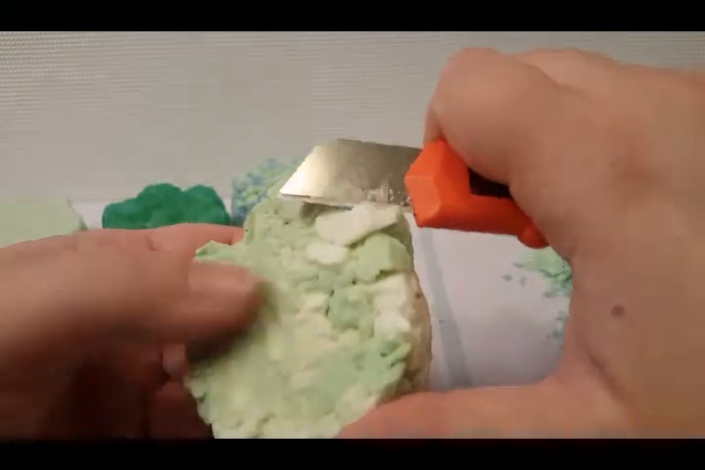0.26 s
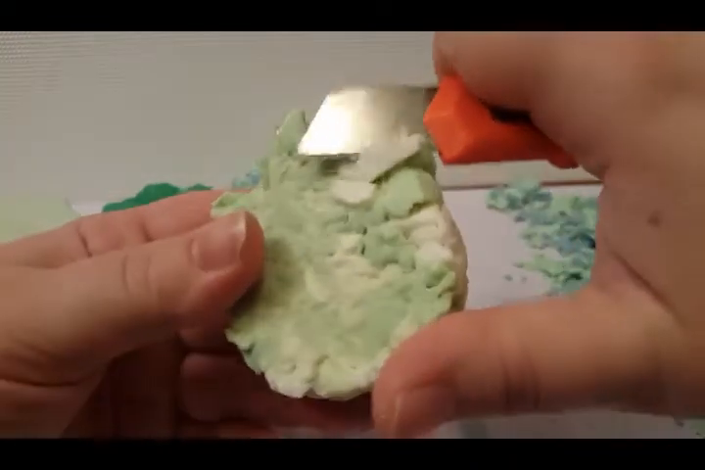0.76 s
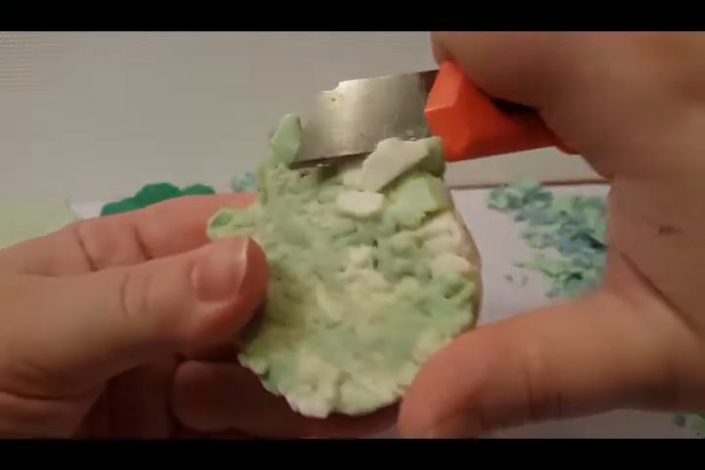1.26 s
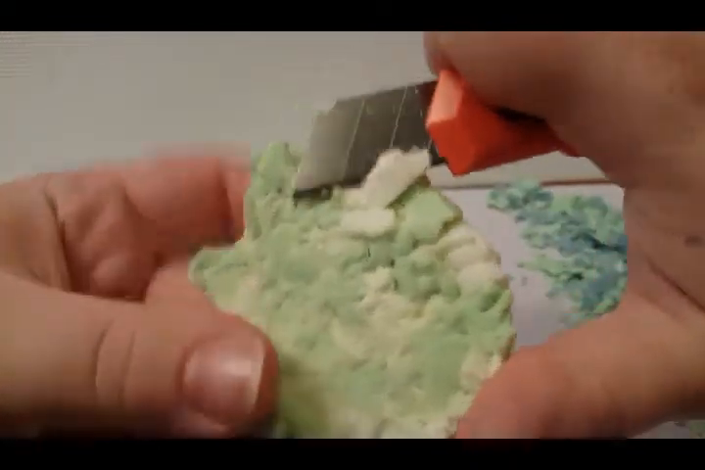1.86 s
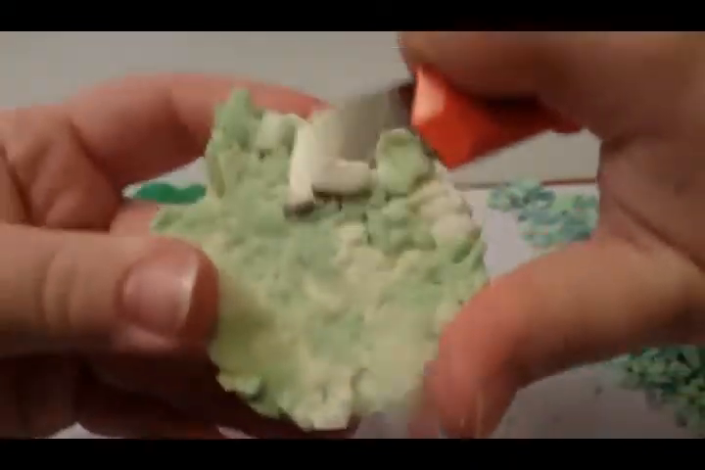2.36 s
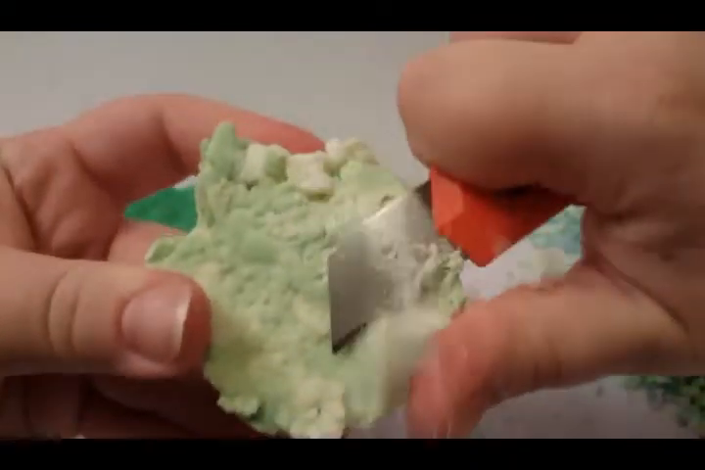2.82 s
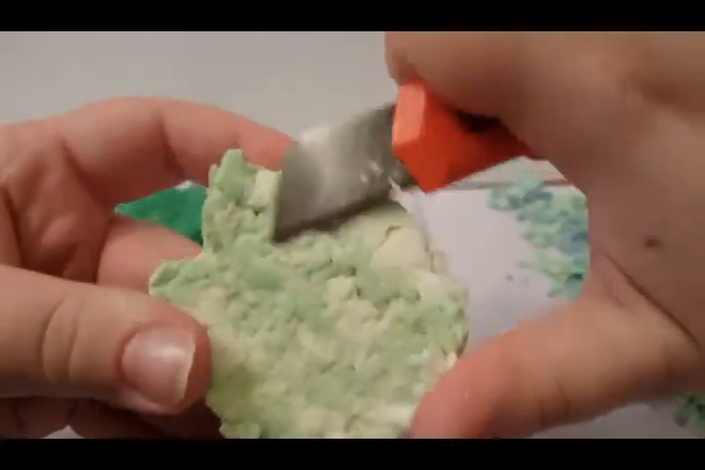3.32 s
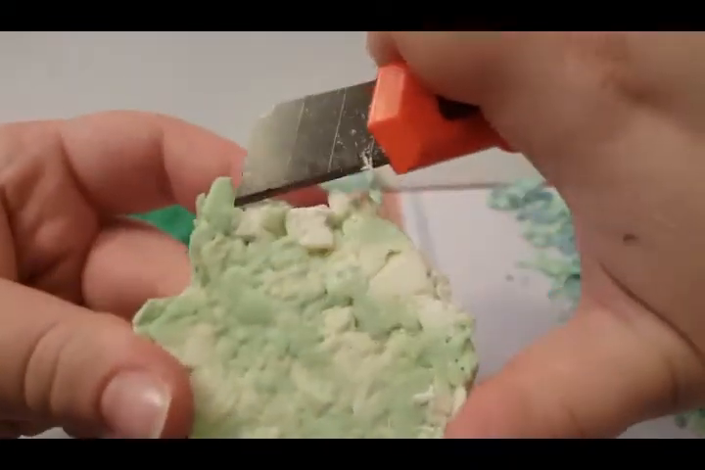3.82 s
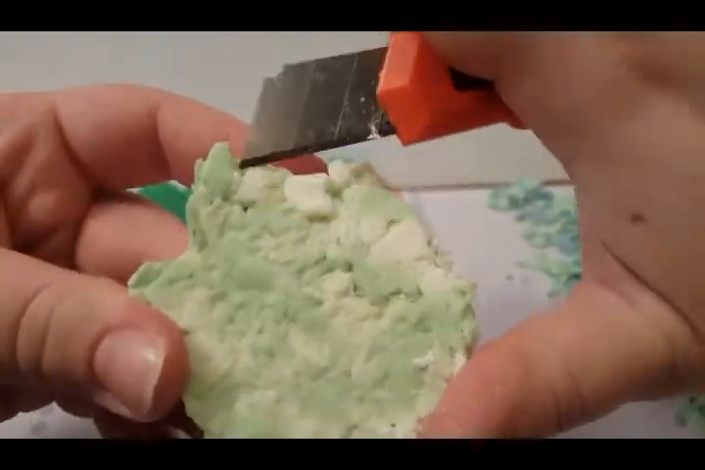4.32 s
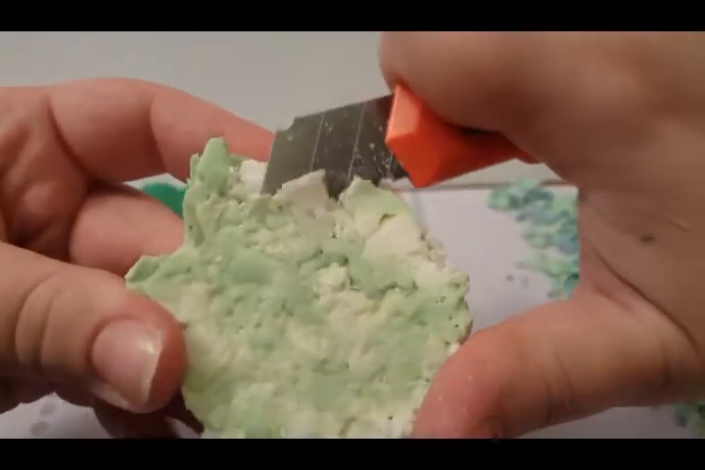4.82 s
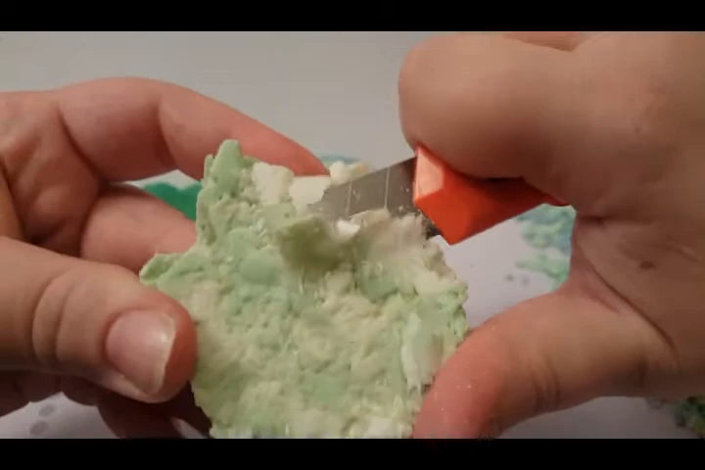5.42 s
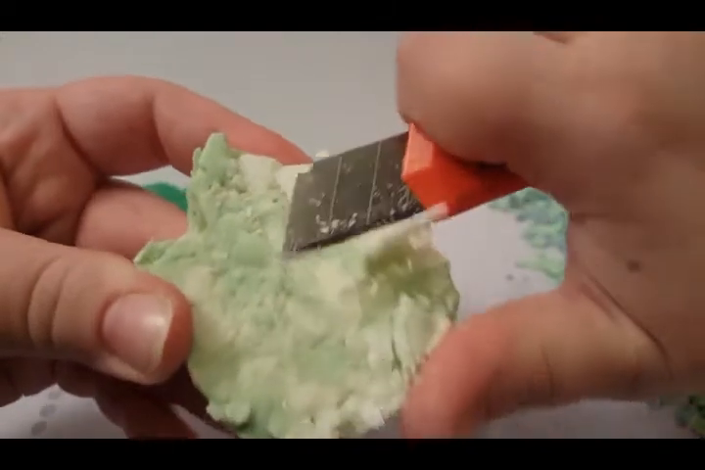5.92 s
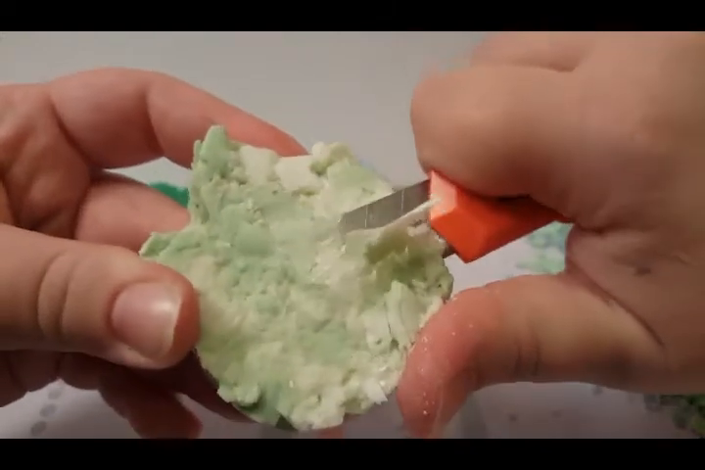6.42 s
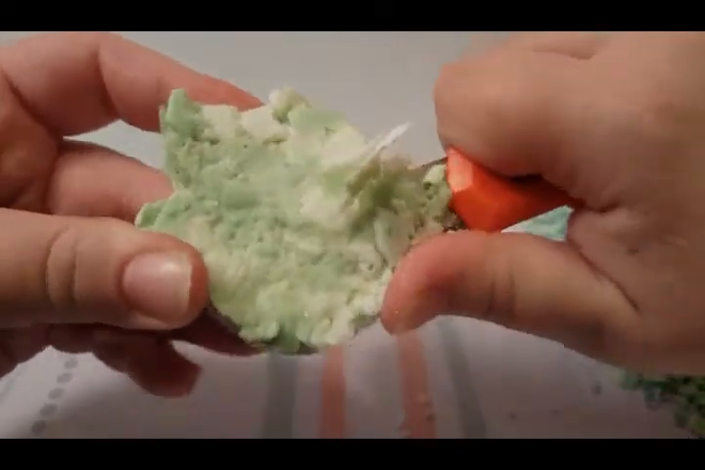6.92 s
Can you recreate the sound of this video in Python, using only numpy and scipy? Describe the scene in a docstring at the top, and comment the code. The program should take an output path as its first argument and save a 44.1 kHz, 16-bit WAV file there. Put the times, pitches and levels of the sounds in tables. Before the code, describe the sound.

Brittle soap flakes crack and crumble under a loose, rattling blade, close up in a small quiet room with low steady hum.

```python
"""A snap-off knife chips and shaves a dry, crumbly bar of soap: flakes and crumbs break as shaped noise bursts.
The dragging edge adds a crackle of sparse grains; the blade knocks and rubs in its plastic holder.
Chips tap the table, and hands bump it as decaying modes plus a dull noise rattle.
A noise tail makes the small room; wavering hum lines and steady air noise lie behind.
A close stereo phone picks it all up."""
import sys
import numpy as np
from scipy import signal
from scipy.fft import rfft, irfft, next_fast_len
from scipy.io import wavfile
from scipy.ndimage import uniform_filter1d

SR = 44100
rng = np.random.default_rng(int(sys.argv[2]) if len(sys.argv) > 2 else 0)


def master(y):
    """Save y as 16-bit WAV."""
    cut = np.clip(np.atleast_2d(y).T, -1, 1)
    pcm = np.round(cut * 32767)  # scale
    wavfile.write(sys.argv[1], SR, pcm.astype(np.int16))


N = 316197
# Event level_db: energy spread over 5 ms, before room and phone. Spectrum level_db: relative.
# pan_db: left minus right.

# Flakes breaking: start_s, level_db, decay_ms, pan_db, depth_db, crispness_db
SNAPS = [(0.1425, -53, 4.7, -8, 15, -13), (0.1705, -48, 1.4, -2.5, 12, -20), (0.4868, -57, 0.86, -2, 2, 26),
         (1.6805, -25.5, 1.8, -3, 1.5, 16.5), (1.6906, -43.5, 2.5, -9, 6, -5), (1.7377, -39, 1, -1, 9, 24),
         (1.7881, -40, 2.2, -9.5, 3.5, -5), (1.8374, -47.5, 1.4, -23, -4, -15),
         (1.9039, -54, 3.6, -16, 0, -32), (1.9281, -50.5, 0.5, -14, 7, -21), (1.9443, -44, 11, -5, 6, 4),
         (2.3173, -56, 1.5, -6, 15, 24), (2.3575, -53.5, 0.78, -3, 4, 15), (2.4188, -56, 0.87, -1, 8, 3),
         (2.4485, -53.5, 17, -4.5, 9, 17), (2.5692, -22, 3.2, 0, 6, 9.5),
         (2.6717, -37.5, 1.7, -14.5, 13.5, 5), (2.6773, -34.5, 0.77, 12, 4.5, -8),
         (2.7562, -34, 0.68, 3, 2, -9), (2.763, -23.5, 2.1, -11, -6, -1), (2.7672, -24, 1.2, 10, -7, 8.5),
         (2.776, -39.5, 6.6, -14, 0, 14), (2.796, -43.5, 3.7, -2, 16, 29), (2.812, -37, 10.5, -4, 10, 16),
         (2.8245, -39, 3.9, 0, -4, 2), (2.8395, -40.5, 4.2, 2, -1, -4), (2.8817, -38.5, 1.4, -2, -7, 0.5),
         (2.9198, -40.5, .85, 4, -10, -3), (3.0009, -40.5, 1.2, -5, -3, 10),
         (3.0073, -41, 1.7, -6, -11, -17), (3.0112, -33.5, 2.6, -.5, -27, 14),
         (3.0405, -30, 0.82, -5.5, 4, 17), (3.0523, -36.5, 1.1, 3.5, 0, 15),
         (3.0788, -47, 2.2, -1, -17, 19), (3.0958, -28, 2.1, 3.5, 6, 12), (3.0999, -22, 4.6, -3.5, -10, 4),
         (3.1039, -38, 3.5, -3, -1, 4.5), (3.1274, -25.5, 2.1, 0.5, -3.5, -6.5),
         (3.2144, -40.5, 0.68, -4.5, 3.5, 19), (3.2456, -45.5, 3.6, -0.5, -3, -1),
         (3.6567, -28.5, 5.1, 1, -15, -9), (3.7336, -30, 1.5, -0.5, -14.5, 8), (3.8, -38, 7.9, -9, -8, 27),
         (4.3353, -48.5, 1.8, 2, -16, 13), (4.3445, -35.5, 1.9, 1.5, -7, 7), (4.598, -41, 1.9, -.5, 1, -1),
         (4.7461, -53, 2.3, -4.5, 5, 38), (4.957, -60.5, 1.2, 0, -14, 19), (5.0532, -48, 1.9, 0, -9, 15),
         (5.0611, -52, 1, 0, -15, 16), (5.0887, -43, 1.8, 2.5, -5, -20), (5.1341, -41, 0.57, 0, -7, 10),
         (5.1868, -46, 2.2, 2, -6, 0), (5.2487, -55, .9, 1, -11, -6), (5.3292, -55.5, 1.4, 1, -15, 7),
         (5.3646, -51.5, 2, -1, -26, 11), (5.4207, -45, 3.8, -2, 1, 13), (5.4241, -40, 0.95, 4.5, -9, -24),
         (5.4531, -39, 2.1, 1.5, -7, 11), (5.526, -51.5, 1.9, 1, -9, 6), (5.7977, -42.5, 0.6, -1.5, -3, 18),
         (5.8238, -31, 12.4, -1.5, -0.5, 6), (5.8529, -36.5, 4.5, 0, -7, 18),
         (5.8693, -38, 2.4, -6, -4, 19.5), (5.8813, -22.5, 1.9, 2, -0.5, 14),
         (6.0009, -49, 1, 1, -12.5, 19.5), (6.1818, -58.5, 2.5, -13, 7, 16),
         (6.5398, -52.5, 1.7, -1.5, -10, 9), (6.6041, -56.5, 1.9, 0, -20, 9),
         (6.7427, -46.5, 1.2, -.5, -11, 2), (6.8621, -55, 1.5, 6, -14, 3)]
# Bar and blade struck by a crack: freq_hz, level_db
SOAP_SPECTRUM = [(100, -21), (900, -16), (1500, -13.5), (2200, -9.5), (3000, -3.5), (3700, -3),
                 (4400, -1.5), (5300, -5.5), (6500, -15), (8000, -21), (9500, -36), (12000, -34.5),
                 (14500, -39.5)]
# Thick flake, moves more of the bar: freq_hz, share of depth_db
DEPTH_TINT = [(600, 0.56), (1600, 1), (2400, 0.73), (4500, 0)]
# Clean break, more treble: freq_hz, share of crispness_db
CRISPNESS_TINT = [(4500, 0.032), (7500, 0.29), (12000, 0.8)]
# Blade knocking in its holder: start_s, level_db, decay_ms, rasp_db, upper_ring_db
KNOCKS = [(0.0683, -31.5, 6.9, -6, -6), (0.081, -39.5, 6.7, -2, 18), (0.803, -52, 48, 11.5, 9),
          (0.8293, -38.5, 3.8, -1, 14), (3.3374, -34, 4.8, -4, 16), (3.3842, -48, 2.5, -22, -8),
          (3.4206, -53, 2, -28, -23), (3.4406, -57, 4, -30, -20), (3.7898, -33.5, 2, -2, -4),
          (3.794, -20.5, 2.7, -6, -12.5), (3.9526, -50, 2.2, -7, 8), (3.991, -57.5, 7.5, -5, 2),
          (4.037, -51.5, 6, 0.5, 5), (4.117, -49, 13, 4.5, 11), (4.251, -51, 9.5, -9, -8),
          (4.364, -40, 38, -3.5, 8), (4.401, -31, 8.7, -8.5, -5), (4.418, -30.5, 6.6, -7.5, -3),
          (4.454, -45, 12, -4, -2), (4.4686, -38, 2.8, -3.5, 1), (4.5665, -43.5, 1.9, -19, 4),
          (4.787, -55.5, 8.4, 7, 11), (4.832, -62.5, 8.3, 1, 0), (4.884, -56, 9.4, 5.5, 4),
          (5.636, -45.5, 17, 7, 3), (7.1505, -35.5, 9.5, -17.5, 3)]
# Hollow handle, rings near 2 and 3 kHz: freq_hz, level_db
HOLDER_SPECTRUM = [(100, -19), (600, -13), (1150, -17), (1550, -17), (1770, -9), (1950, 2), (2100, -2),
                   (2500, -13), (3030, -5), (3400, -10), (4500, -11), (7000, -15), (9500, -27),
                   (14500, -29)]
# Rubbing blade, spreads below and above the holder's rings: freq_hz, share of rasp_db
RASP_TINT = [(900, 1.67), (1950, 0.18), (3000, 0.55), (4500, 1.14), (7500, 1), (12000, 1.4)]
# Knock near the tip, wakes the higher resonance: freq_hz, share of upper_ring_db
UPPER_RING_TINT = [(2400, 0.19), (2950, 0.56), (3400, 0.32), (4400, 0)]
# Drag of the edge through the soap: time_s, force_db
DRAG = [(0.0, -64), (0.18, -73), (1.38, -78.5), (1.72, -72.5), (1.84, -61), (2.0, -74), (2.43, -72.5),
        (2.79, -57), (2.98, -63), (3.46, -68.5), (3.66, -70.5), (3.8, -67.5), (4.17, -75.5), (4.49, -69),
        (5.16, -73), (5.26, -69.5), (6.33, -77), (7.1, -72)]
# Shaved grains: freq_hz, level_db
SHAVINGS_SPECTRUM = [(300, -8), (900, -9.5), (2000, -10), (3200, -7.5), (4800, -7.5), (6500, -4.5),
                     (8000, -13.5), (10000, -33), (14500, -26.5)]
# Chips landing on the table: start_s, level_db, decay_ms, brightness_db
CHIPS = [(0.0672, -35, 3.7, 4), (6.7814, -27, 2.8, -8.5), (7.0805, -53, 2.7, -25), (7.1501, -37, 1.4, -30)]
# Hollow tap of a chip on the table: freq_hz, level_db
TAP_SPECTRUM = [(100, -20), (750, -28), (1000, -17), (1220, -1), (1450, -16), (1680, -5), (2100, -18),
                (2500, -11), (2780, 1), (3150, -9), (3550, -10), (3980, -26), (4600, -4), (5100, -24),
                (6500, -29), (7600, -15), (9700, -34), (12100, -23), (14500, -38)]
# Hard landing, widens the tap: freq_hz, share of brightness_db
BRIGHTNESS_TINT = [(900, 1.08), (2200, 0.48), (4500, .8), (12000, 1.1)]
# Hands bumping the table: start_s, level_db, push_ms, rattle_db
BUMPS = [(0.587, -33.5, 0.33, -2.5), (0.607, -66, 1, 39), (.668, -41.5, 4, -6), (2.813, -44.5, 0.29, 3),
         (4.111, -55.5, 1.2, 7), (5.564, -45.5, 3.2, -18), (5.635, -46, 0.46, 4), (7.1525, -26.5, 1, 3)]
# Table top modes: freq_hz, level_db, t60_s
TABLE_MODES = [(121, -29.5, 0.088), (129, 8.5, 0.45), (162, -11.5, 0.05), (222, 10, 0.054),
               (289, -8.5, 0.11), (365, 2.5, 0.21), (455, 4.5, 0.18), (519, -4, 0.23), (679, -14, 0.14),
               (783, 4, 0.2), (1095, -27.5, 0.082)]
# Loose things on the table top: freq_hz, level_db
RATTLE_SPECTRUM = [(40, -9), (130, 15.5), (400, 3), (800, -11.5), (1100, -19.5), (1600, -14.5),
                   (3000, -43.5), (8000, -80)]
# Mains and a small motor: freq_hz, level_db (rms)
HUM_LINES = [(58.8, -70.5), (117.5, -77), (120, -68.5), (177.4, -66), (240, -73), (274, -80), (352.5, -75),
             (411.3, -72)]
# Air noise: freq_hz, level_db (per Hz)
AIR_SPECTRUM = [(20, -18.5), (35, -1), (55, -2), (85, -1), (125, -0.5), (148, -0.5), (175, 1.5),
                (230, -0.5), (400, -7), (480, -11.5), (900, -18), (2500, -22), (7000, -30), (14500, -33)]
# Colour of the two microphone ports: freq_hz, left minus right_db
PORT_COLOUR = [(200, 4), (1000, -1.5), (2500, 1), (4400, 2.5), (5600, 4.5), (7500, -6.5), (12000, -3.5)]

SIDES = np.array([[1], [-1]])  # left, right
AIR_DB = -66
KNOCK_PAN_DB, CHIP_PAN_DB = -2.5, -1
GRIP_DETUNE, BLADE_DETUNE = 0.02, 0.028  # largest share by which resonances shift
FINGER_ECHO_MS, FINGER_RIPPLE_DB = 1.213, 1
CRUMB_OVER_DB, CRUMB_SPREAD_DB, CRUMB_PAN_DB, CRUMB_TINT_DB = 8.5, 3, 4, 8
CRUMB_DECAY_MS, CRUMB_DEPTH_DB = 1.8, 9
CRACK_SAMPLES = 4096


def undb(db):
    """Decibels to gain."""
    return 10 ** (np.asarray(db) / 20)


def unit_rms(x):
    """Scale each channel to rms 1."""
    return x / np.sqrt(np.mean(x ** 2, axis=-1, keepdims=True))


def blow_level(x, level_db):
    """Scale each channel so its energy, spread over 5 ms, has this level."""
    return unit_rms(x) * np.sqrt(0.005 * SR / x.shape[-1]) * undb(level_db)


def curve_db(points, size):
    """Interpolate a spectrum over log frequency at the FFT bins."""
    hz, db = np.transpose(points)
    return np.interp(np.log(np.fft.rfftfreq(size, 1 / SR) + 1), np.log(hz), db)


def colour(x, points):
    """Filter a sound by a spectrum."""
    size = next_fast_len(x.shape[-1], True)
    return irfft(rfft(x, size) * undb(curve_db(points, size)), size)[..., :x.shape[-1]]


def causal(gain):
    """Minimum-phase response: this gain, ringing only after the blow."""
    cepstrum = irfft(np.log(gain))
    half = cepstrum.shape[-1] // 2
    cepstrum[..., 1:half] *= 2
    cepstrum[..., half + 1:] = 0
    return np.exp(rfft(cepstrum))


def add(out, start_s, x):
    """Mix in a short sound."""
    i = int(start_s * SR)
    out[:, i:i + x.shape[-1]] += x[:, :max(N - i, 0)]


def walk(rate_hz):
    """Slow random curve of rms near 1."""
    hold = int(SR / rate_hz)
    steps = np.repeat(rng.standard_normal(N // hold + 1), hold)
    return unit_rms(uniform_filter1d(uniform_filter1d(steps, hold), hold)[:N])


def crack(decay_ms, shape_db, rise, first, tail_db, tail_ms, tail_top_hz, grit_db=3.0, alike_hz=1900):
    """A break sets off a swelling, then dying run of tiny ones; hands and table scatter a duller tail."""
    size = CRACK_SAMPLES
    t_ms = np.arange(size) * 1000 / SR
    decay_ms = max(decay_ms, 0.3)
    # fits and starts of about 1 ms
    fits = undb(grit_db * unit_rms(uniform_filter1d(rng.standard_normal(size), size=50)))
    swell = 1 - np.exp(-t_ms / (rise * decay_ms))
    burst = rng.standard_normal((2, size)) * unit_rms(fits) * np.exp(-t_ms / decay_ms) * swell
    scatter = rng.standard_normal((2, size)) * undb(tail_db) * np.exp(-t_ms / tail_ms)
    burst += signal.sosfilt(signal.butter(2, tail_top_hz, fs=SR, output="sos"), scatter)
    burst[:, 0] += first
    spectrum = rfft(burst)
    # long waves reach both ports alike
    alike = 1 / (1 + (np.fft.rfftfreq(size, 1 / SR) / alike_hz) ** 2)
    spectrum[0] = alike * spectrum[1] + (1 - alike) * spectrum[0]
    # the body sets the broad colour, chance only the fine ripple
    broad = np.sqrt(uniform_filter1d(np.abs(spectrum) ** 2, size=90, axis=-1))
    ports_db = SIDES * curve_db(PORT_COLOUR, size) / 2
    sound = irfft(spectrum * causal(undb(shape_db + ports_db) / broad))
    sound[0] = np.roll(sound[0], 6)  # samples: left port is a little further away
    return sound


def breaks(events, body, tints, detune, **crack_settings):
    """Cracks through a body: tints lean the colour, grip shifts resonances, finger echo ripples it."""
    out = np.zeros((2, N))
    khz = np.fft.rfftfreq(CRACK_SAMPLES, 1000 / SR)
    chances = rng.uniform(-1, 1, (len(events), 3))
    for (start_s, level_db, decay_ms, pan_db, *amounts_db), (shift, reach, turn) in zip(events, chances):
        gripped = np.array(body) * [1 + detune * shift, 1]
        shape_db = curve_db(gripped, CRACK_SAMPLES)
        for amount_db, tint in zip(amounts_db, tints):
            shape_db = shape_db + amount_db * curve_db(tint, CRACK_SAMPLES)
        echo_ms = FINGER_ECHO_MS * (1 + 0.5 * reach)
        shape_db = shape_db + FINGER_RIPPLE_DB * np.cos(2 * np.pi * khz * echo_ms + np.pi * turn)
        sound = crack(decay_ms, shape_db, **crack_settings)
        add(out, start_s, blow_level(sound, level_db + SIDES * pan_db / 2))
    return out


def background(waver_db=0.2, drift_rad=0.23, wide_hz=900):
    """Wavering appliance hum lines over steady air noise, its bass nearly alike at both ports."""
    t = np.arange(N) / SR
    hum = np.zeros(N)
    for hz, level_db in HUM_LINES:
        phase = drift_rad * walk(3.4) + 2 * np.pi * rng.random()
        hum += np.sqrt(2) * undb(level_db + waver_db * walk(5.5)) * np.sin(2 * np.pi * hz * t + phase)
    mid, side = unit_rms(colour(rng.standard_normal((2, N)), AIR_SPECTRUM))
    side = signal.sosfilt(signal.butter(1, wide_hz, "high", fs=SR, output="sos"), side) + 0.18 * side
    return hum + undb(AIR_DB) * (mid + SIDES * side)


def room(x, wet_db=-14, t60_s=0.26, build_s=0.00057, split_hz=5500, top_hz=8500):
    """A small furnished room: a diffuse, quickly building noise tail with its top rolled off."""
    t = np.arange(SR // 2) / SR
    low = signal.sosfilt(signal.butter(2, split_hz, fs=SR, output="sos"), rng.standard_normal((2, len(t))))
    high = signal.sosfilt(signal.butter(2, split_hz, "high", fs=SR, output="sos"),
                          rng.standard_normal((2, len(t))))
    tail = (low + high) * undb(-60 * t / t60_s) * (1 - np.exp(-(t / build_s) ** 2))
    tail = signal.sosfilt(signal.butter(3, top_hz, fs=SR, output="sos"), unit_rms(tail) / np.sqrt(len(t)))
    return x + undb(wet_db) * signal.fftconvolve(x, tail, axes=1)[:, :N]


def table_ring(phase_spread_rad):
    """Decaying table modes, their phases unlike at the two ports."""
    t = np.arange(SR // 2) / SR
    out = np.zeros((2, len(t)))
    for hz, level_db, t60_s in TABLE_MODES:
        phase = phase_spread_rad * rng.standard_normal((2, 1))
        out += undb(level_db) * np.exp(-np.log(1000) * t / t60_s) * np.sin(2 * np.pi * hz * t + phase)
    return out


def bumps(rattle_t60_s=0.48, onset_ms=0.64):
    """Soft blows ring the table and shake what lies on it; a longer push lowpasses the ring more."""
    out = np.zeros((2, N))
    for start_s, level_db, push_ms, rattle_db in BUMPS:
        top = unit_rms(table_ring(phase_spread_rad=0.37))
        t = np.arange(top.shape[-1]) / SR
        noise = rng.standard_normal(len(t)) + 0.5 * rng.standard_normal((2, len(t)))
        rattle = colour(noise, RATTLE_SPECTRUM) * undb(-60 * t / rattle_t60_s)
        keep = np.exp(-1000 / (SR * max(push_ms, 0.1)))
        thud = unit_rms(signal.lfilter([1 - keep], [1, -keep], top)) + undb(rattle_db) * unit_rms(rattle)
        # skin gives way first: no click
        contact = 1 - np.exp(-(1000 * t / onset_ms) ** 2)
        add(out, start_s, blow_level(thud * contact, level_db))
    return out


def chips():
    """Cut pieces drop on the table: cracks through the hollow tap spectrum."""
    events = [(start_s, level_db, decay_ms, CHIP_PAN_DB, bright_db)
              for start_s, level_db, decay_ms, bright_db in CHIPS]
    return breaks(events, TAP_SPECTRUM, [BRIGHTNESS_TINT], detune=0, rise=0.091, first=3.4,
                  tail_db=-17, tail_ms=13, tail_top_hz=4430)


def blade():
    """The loose blade knocks and rubs in its holder, always panned alike; play shifts the ring."""
    events = [(start_s, level_db, decay_ms, KNOCK_PAN_DB, rasp_db, upper_db)
              for start_s, level_db, decay_ms, rasp_db, upper_db in KNOCKS]
    return breaks(events, HOLDER_SPECTRUM, [RASP_TINT, UPPER_RING_TINT], detune=BLADE_DETUNE, rise=0.26,
                  first=0.43, tail_db=-19.0, tail_ms=14.0, tail_top_hz=5910)


def scrape(grains_per_s=800, scatter_db=5.0, grain_ms=0.82, quiet_db=-76, gain_db=-3, holder_db=-11):
    """The edge crushes grains, a few large among many small; they die out when it stops pressing."""
    time_s, drag_db = np.transpose(DRAG)
    force = undb(np.interp(np.arange(N) / SR, time_s, drag_db))
    force = force * force ** 2 / (force ** 2 + undb(quiet_db) ** 2)
    sizes = undb(scatter_db * np.minimum(rng.exponential(size=N), 5))
    grains = (rng.random(N) < grains_per_s / SR) * sizes * rng.choice([-1, 1], N)
    # four spots along the edge, each with its own short ring
    spot = rng.integers(0, 4, N)
    fade = np.exp(-np.arange(512) * 1000 / SR / grain_ms)
    sound = np.zeros((2, N))
    for k in range(4):
        spot_ring = rng.standard_normal((2, len(fade))) * fade
        sound += signal.fftconvolve((grains * (spot == k))[None], spot_ring, axes=1)[:, :N]
    # grains shake the blade: faint holder ring
    ringing = undb(holder_db + SIDES * KNOCK_PAN_DB / 2) * unit_rms(colour(sound, HOLDER_SPECTRUM))
    return (unit_rms(colour(sound, SHAVINGS_SPECTRUM)) + ringing) * force * undb(gain_db)


def crumbs(count=80, bite_db=-73):
    """Events for small breaks at random moments: harder drag, larger crumb; steeper fall below bite."""
    time_s, force_db = np.transpose(DRAG)
    starts_s = (np.arange(count) + rng.random(count)) / count * N / SR
    drag_db = np.interp(starts_s, time_s, force_db)
    levels_db = drag_db + CRUMB_OVER_DB + np.minimum(drag_db - bite_db, 0)
    return [(start_s, level_db + CRUMB_SPREAD_DB * a, CRUMB_DECAY_MS, CRUMB_PAN_DB * b,
             CRUMB_DEPTH_DB + CRUMB_TINT_DB * c, CRUMB_TINT_DB * d)
            for start_s, level_db, (a, b, c, d) in zip(starts_s, levels_db, rng.standard_normal((count, 4)))]


def soap():
    """Flakes and crumbs break off the bar: cracks through the soap spectrum."""
    return breaks(SNAPS + crumbs(), SOAP_SPECTRUM, [DEPTH_TINT, CRISPNESS_TINT], detune=GRIP_DETUNE,
                  rise=0.092, first=3.92, tail_db=-19.5, tail_ms=14.0, tail_top_hz=6950)


def scene():
    """Knife, soap and table in the room, over the background."""
    return room(soap() + blade() + chips() + scrape() + bumps()) + background()


def record(dry):
    """The phone cuts the deepest bass, rounds the tallest peaks and cuts the top."""
    dry = signal.sosfilt(signal.butter(3, 42, "high", fs=SR, output="sos"), dry)
    dry = 0.6 * np.tanh(dry / 0.6)
    return signal.sosfilt(signal.ellip(8, 0.2, 70, 14600, fs=SR, output="sos"), dry)


dry = scene()
out = record(dry)
master(out)
```